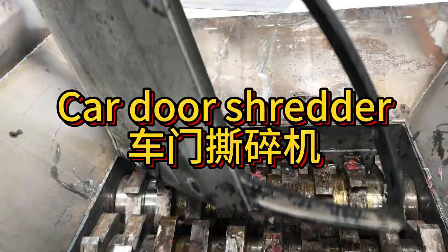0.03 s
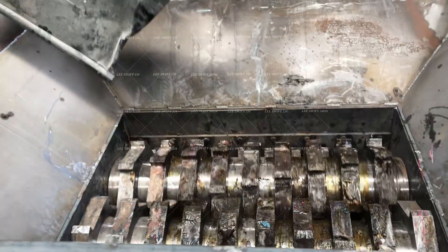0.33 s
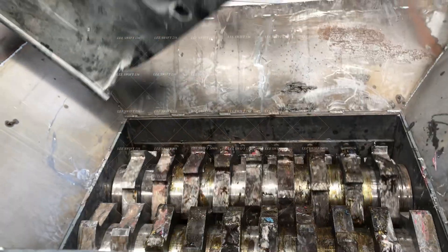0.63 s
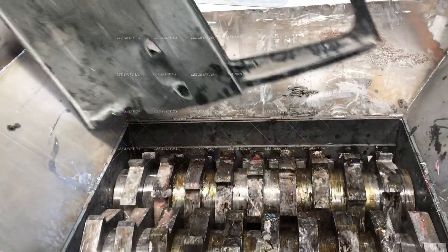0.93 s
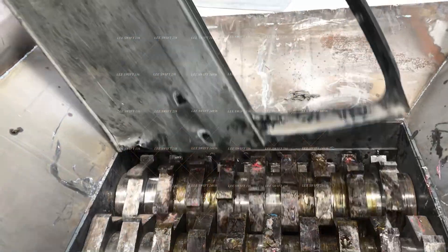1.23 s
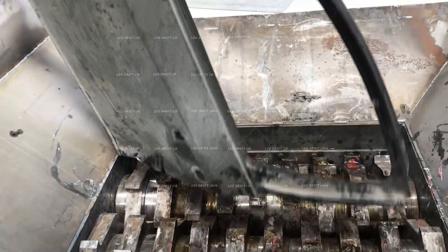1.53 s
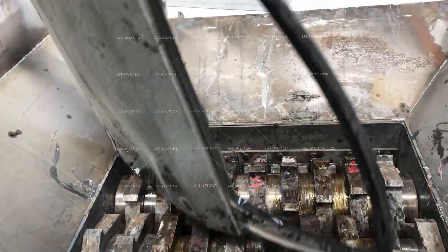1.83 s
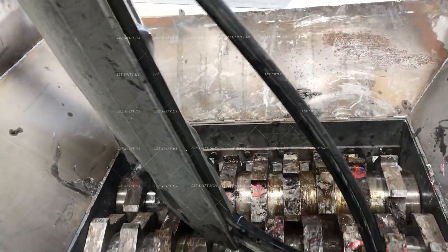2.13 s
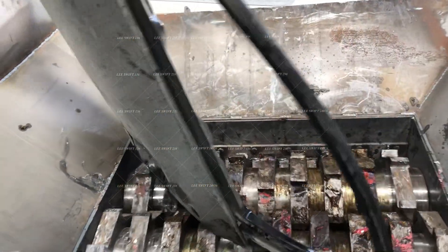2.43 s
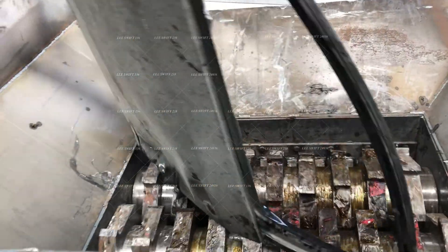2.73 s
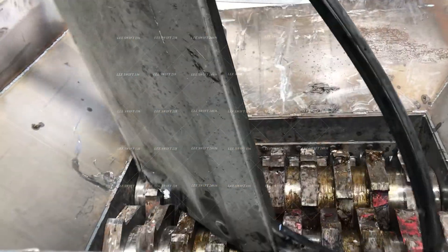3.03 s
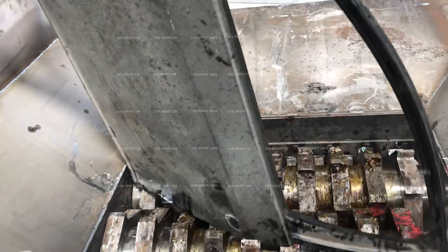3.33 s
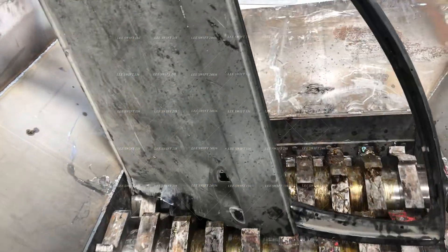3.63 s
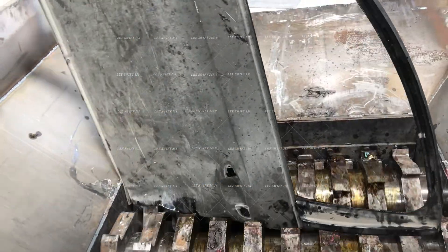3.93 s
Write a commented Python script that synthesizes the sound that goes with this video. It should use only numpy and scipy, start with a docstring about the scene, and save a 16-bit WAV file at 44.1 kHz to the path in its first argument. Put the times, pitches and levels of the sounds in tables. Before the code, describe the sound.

An industrial shredder rumbles while a metal car door scrapes and crunches in its teeth.

```python
"""A car door in a shredder

A twin-shaft shredder runs close by: its meshing gears hum and knock inside a rumbling steel hopper.
A sheet-metal car door slides onto the teeth and scrapes by stick-slip friction, then cracks, booms,
groans and tears as they bite. The sound is nearly mono, and a limiter holds down its peaks."""
import sys
import numpy as np
from scipy import signal
from scipy.fft import rfft, irfft, next_fast_len
from scipy.io import wavfile
from scipy.ndimage import uniform_filter1d, minimum_filter1d, map_coordinates

SR = 44100
rng = np.random.default_rng(int(sys.argv[2]) if len(sys.argv) > 2 else 0)


def generate_wav(sig):
    """Save sig (samples, or channels by samples) to the path in sys.argv[1] as 16-bit PCM at SR."""
    pcm = np.round(np.clip(np.atleast_2d(sig).T, -1, 1) * 32767).astype(np.int16)
    wavfile.write(sys.argv[1], SR, pcm)


N = 176400
START_S, TEAR_S = 0.1517, 3.05  # the sound cuts in; the sheet starts to tear


def amp(db):
    """Decibels to amplitude ratio."""
    return 10 ** (np.asarray(db) / 20)


def unit(x):
    """Normalisation to rms 1."""
    return x / np.sqrt(np.mean(x ** 2) + 1e-20)


def along(points, hz):
    """Interpolation of (frequency_hz, value) points on a logarithmic frequency axis."""
    frequencies, values = np.transpose(points)
    return np.interp(np.log(hz + 1), np.log(frequencies + 1), values)


def clock():
    """Time of every sample in seconds."""
    return np.arange(N) / SR


def curve(rows):
    """Linear interpolation of (time_s, value) points."""
    return np.interp(clock(), *np.transpose(rows))


def wobble(rate):
    """Smooth random modulation: a spline through `rate` Gaussian knots a second."""
    grid = np.arange(0, N / SR * rate + 1, 1 / 8)
    spline = map_coordinates(rng.standard_normal(8192), [grid + 2], mode="wrap")
    return np.interp(clock() * rate, grid, spline)


def envelope(start, length, attack, t60):
    """Linear attack, hold until `length`, then exponential decay; all in seconds."""
    t = clock() - start
    return np.clip(t / attack, 0, 1) * amp(-60 * np.maximum(t - length, 0) / t60)


def filtered(x, response):
    """Linear filtering: the spectrum times a frequency response."""
    size = next_fast_len(N + 8192)
    return irfft(rfft(x, size) * response(np.fft.rfftfreq(size, 1 / SR)), size)[..., :N]


def coloured(x, colour):
    """Spectral shaping by (frequency_hz, gain_db) points, normalised to rms 1."""
    return unit(filtered(x, lambda hz: amp(along(colour, hz))))


def band(hz, octaves):
    """A noise-driven resonance of rms 1: a Gaussian band with a 1/e half-width in octaves."""
    noise = rng.standard_normal(N)
    return unit(filtered(noise, lambda f: np.exp(-(np.log2((f + 1) / hz) / octaves) ** 2)))


def grit(rate, depth_db):
    """Stick-slip grains: noise under random amplitude modulation."""
    return rng.standard_normal(N) * amp(depth_db * wobble(rate))


def patchy(x, depth_db):
    """Uneven excitation of resonances: random patches of gain in time and frequency, at rms 1."""
    spectra = signal.stft(x, nperseg=512)[2]
    field = rng.standard_normal(spectra.shape)
    for _ in range(2):
        field = uniform_filter1d(field, size=9, axis=0)
        field = uniform_filter1d(field, size=3, axis=1)
    return unit(signal.istft(spectra * amp(depth_db * unit(field)), nperseg=512)[1][:N])


def hopper(x):
    """Reverberation between steel walls: each frequency decays at its own rate."""
    decay = [(200, 0.52), (2000, 0.85), (6000, 0.2), (16000, 0.068)]  # frequency_hz, t60_s
    out, step = np.zeros(N + SR), SR // 5
    for i in range(0, N, step):  # a fresh random tail each step stays diffuse, with no steady ring
        hz, t, spectra = signal.stft(rng.standard_normal(SR // 3), SR, nperseg=256)
        damping = amp(-60 * t / along(decay, hz)[:, None])
        tail = signal.istft(spectra * damping, SR, nperseg=256)[1]
        echo = signal.fftconvolve(x[i:i + step], tail / np.linalg.norm(tail))
        out[i:i + len(echo)] += echo
    return out[:N]


def gear_hum(mesh_cycles, whine_hz=878, whine_db=-38):
    """Periodic tooth contact radiates harmonics of the mesh rate; the motor adds a thin whine."""
    harmonics = [(1, -38), (3, -28), (4, -31), (5, -30.5), (6, -38.5)]  # gear partials: harmonic_number, level_db
    drone = [(0.16, -21.5), (0.5, -21), (0.8, -27.5), (1.48, -20.5), (1.63, -13.5), (1.76, -18),
             (2.22, -26), (2.69, -20.5), (2.75, -13), (2.85, -17.5), (3.24, -24), (3.28, -14), (3.35, -45),
             (3.44, -16.5), (3.65, -36), (3.88, -15.5), (4.0, -23.5)]  # strong second harmonic: time_s, level_db
    swells = [(0.21, 0.24, -28.5), (2.74, 0.052, -26), (2.9, 0.033, -18), (3.689, 0.25, -16.5)]  # third harmonic under load: start_s, length_s, level_db
    levels = {round(k): amp(db + 3.05 * wobble(8)) for k, db in harmonics}
    levels[2] = amp(curve(drone))
    swell = sum(amp(db) * envelope(start, length, attack=0.045, t60=0.22) for start, length, db in swells)
    levels[3] += swell * amp(1.6 * wobble(25))
    hum = amp(whine_db + 4.4 * wobble(3.7)) * np.sin(2 * np.pi * whine_hz * clock())
    for k, level in levels.items():
        phase = 2 * np.pi * (k * mesh_cycles + rng.random()) + 0.34 * wobble(13)
        hum += level * np.sqrt(2) * np.sin(phase)
    return hum


def rumble(mesh_cycles, jitter_s=0.0006, scatter_db=3.5, knock_t60_s=0.054):
    """Impact excitation: gear teeth knock the hopper with uneven force, over the churn of the shafts."""
    colour = [(20, -49), (60, -46), (88, -9), (115, -1.5), (165, 2), (245, 0), (310, -3.5), (400, -2.5),
              (560, -7), (750, -7), (920, -12.5), (1350, -14), (1900, -21.5), (2500, -29.5), (4000, -38.5),
              (9000, -47), (16000, -49)]  # hopper response: frequency_hz, gain_db
    load = [(0.16, -19), (0.35, -17.5), (0.75, -21), (1.15, -16.5), (1.16, -19.5), (1.38, -16), (1.81, -19),
            (2.22, -18), (2.26, -19.5), (3.24, -16.5), (3.26, -20.5), (3.56, -18), (3.97, -18.5),
            (4.0, -20.5)]  # rumble contour: time_s, gain_db
    contacts = np.flatnonzero(np.diff(np.floor(mesh_cycles)))
    timing, force = rng.standard_normal((len(contacts), 2)).T
    onsets = np.clip(contacts + (timing * jitter_s * SR).astype(int), 0, N - 1)
    knocks, t = np.zeros(N + SR), np.arange(SR // 16) / SR
    for i, size in zip(onsets, amp(scatter_db * force)):
        knocks[i:i + len(t)] += size * rng.standard_normal(len(t)) * amp(-60 * t / knock_t60_s)
    churn = grit(rate=100, depth_db=0.7)
    return amp(curve(load)) * (amp(-6) * coloured(knocks[:N], colour) + amp(1) * coloured(churn, colour))


def grinding():
    """Resonance: the cutters grind in one narrow band."""
    level = [(.16, -29), (1.2, -36), (1.6, -32.5), (2.3, -30), (2.6, -25.5), (3.0, -23.5), (3.35, -34),
             (3.53, -21.5), (3.72, -33), (4, -45)]  # cutter resonance: time_s, level_db
    return amp(curve(level)) * band(hz=670, octaves=0.14)


def frame_shake():
    """Forced vibration: the frame shakes at random in the deep bass."""
    strength = [(.16, -33), (.3, -27), (.88, -37), (.98, -19), (1.4, -22), (1.75, -31), (2.3, -33),
                (2.8, -38), (3.5, -28), (4, -37)]  # shake contour: time_s, gain_db
    colour = [(20, -36), (36, -16), (52, 11.5), (70, 10.5), (95, 10), (140, -35)]  # frame response: frequency_hz, gain_db
    return amp(curve(strength) - 4) * coloured(rng.standard_normal(N), colour)


def scraping():
    """Stick-slip friction: steel rubs on the teeth throughout, with harsh scrapes where the panel slips."""
    rub_level = [(.16, -46), (.3, -38), (.45, -42), (.93, -43.5), (1.1, -31.5), (1.33, -33), (1.65, -37.5),
                 (1.88, -43), (2.05, -37.5), (2.35, -50), (2.48, -43), (2.56, -42), (2.75, -42.5),
                 (3.0, -38.5), (3.38, -46), (3.55, -41), (3.7, -38.5), (4, -41)]  # continuous rubbing: time_s, level_db
    slips = [(0.218, 0.018, -33, -42), (0.965, 0.051, -24.5, -36), (1.012, 0.027, -23.5, -24),
             (1.049, 0.032, -25, -45), (1.168, 0.056, -22.5, -36), (1.271, 0.034, -23.5, -38),
             (1.722, 0.076, -34, -45), (1.93, 0.079, -32, -41), (2.535, .03, -41, -38),
             (3.213, 0.022, -36, -36), (3.573, 0.049, -29, -24.5), (3.626, 0.039, -46, -30.5),
             (3.691, 0.089, -37, -31.5), (3.79, 0.046, -27.5, -25), (3.86, .025, -51, -34),
             (3.914, 0.0069, -22, -39), (3.935, 0.052, -37, -34), (3.988, 0.018, -22.5, -37)]  # scrapes of the panel: start_s, length_s, rasp_db, sizzle_db
    # Friction spectra: frequency_hz, gain_db
    rub_colour = [(500, -11), (1500, 6.5), (3000, 6), (5000, 2), (8000, -1), (11000, -3.5), (15500, -1)]
    rasp_colour = [(400, -2), (1200, 12.5), (2300, -0.5), (3200, 1), (5500, 0.5), (8000, -3), (11000, -10),
                   (16000, 2.5)]
    sizzle_colour = [(3000, -33), (7500, -9.5), (10500, -4), (12500, -0.5), (14000, -2), (15500, 4)]
    gripped = [(3400, 0), (5000, -2.5), (8000, -1)]  # held by the teeth, the sheet rasps less shrilly
    rub = amp(curve(rub_level)) * patchy(coloured(grit(rate=42, depth_db=1.7), rub_colour), depth_db=3)
    rasp = patchy(coloured(grit(rate=150, depth_db=1.5), rasp_colour), depth_db=1)
    gripped_rasp = filtered(rasp, lambda hz: amp(along(gripped, hz)))
    rasp = np.where(clock() < TEAR_S, rasp, gripped_rasp)
    sizzle = patchy(coloured(grit(rate=110, depth_db=3), sizzle_colour), depth_db=1)
    scrapes = np.zeros(N)
    for start, length, rasp_db, sizzle_db in slips:
        friction = amp(rasp_db) * rasp + amp(sizzle_db) * sizzle
        scrapes += envelope(start, length, attack=0.0015, t60=0.083) * friction
    return rub + scrapes


def bending():
    """Tension raises pitch: a short rough groan climbs as the sheet is pulled tight."""
    groan = [(2.02, 150, -50), (2.051, 163.4, -19), (2.081, 182.2, -10.5), (2.109, 226.7, -32),
             (2.136, 244.4, -17), (2.172, 279, -24), (2.24, 290.6, -29), (2.3, 288, -55)]  # tone of the bending sheet: time_s, pitch_hz, level_db
    times, hz, db = np.transpose(groan)
    phase = 2 * np.pi * np.cumsum(np.interp(clock(), times, hz)) / SR + 0.5 * wobble(70)
    level = np.interp(clock(), times, amp(db), left=0, right=0)
    return level * np.sqrt(2) * np.sin(phase)


def booms():
    """Damped free vibration: clusters of panel modes ring and die after the big bites."""
    clusters = [(1.03, 1210, -23, 0.7), (1.0, 90, -21, 0.6), (2.025, 740, -19.5, 0.34),
                (2.07, 70, -28, 0.38), (3.175, 855, -16, 0.072), (3.195, 190, -12.5, 0.32)]  # panel modes: start_s, centre_hz, level_db, t60_s
    return sum(amp(db) * envelope(start, length=0.018, attack=0.0026, t60=t60) * band(hz, octaves=0.83)
               for start, hz, db, t60 in clusters)


def cracks():
    """Fracture releases energy in bursts: each a broad crunch or narrow clank, with a bright snap."""
    # The sheet gives way: start_s, length_s, centre_hz, half_width_octaves, crunch_db, snap_db
    fractures = [(0.221, 0.0042, 2600, 0.35, -31, -36), (0.275, 0.0065, 3000, 0.47, -34, -29.5),
                 (1.034, 0.037, 2700, 1.1, -29, -44), (2.026, 0.0088, 1900, 1.1, -17.5, -30),
                 (2.117, 0.0072, 1900, 1.2, -33, -35), (2.197, 0.0059, 2100, 0.85, -29.5, -31),
                 (2.9435, 0.0085, 1200, 1.1, -25, -34), (2.981, .005, 1600, .9, -27, -43),
                 (3.0844, 0.0047, 2200, 0.73, -23, -28.5), (3.136, 0.011, 1800, 0.45, -25, -45),
                 (3.171, 0.009, 1350, 1.25, -18.5, -24), (3.61, .005, 2800, 0.44, -29, -36),
                 (3.648, 0.0041, 1650, 0.5, -15.5, -15), (3.663, 0.0079, 1650, 0.87, -25, -33),
                 (3.781, 0.0043, 2800, .9, -28.5, -29), (3.81, .011, 3200, 0.93, -29, -40),
                 (3.907, 0.0072, 3280, 0.37, -29, -24), (3.962, 0.0032, 3000, 1.3, -29, -25.5),
                 (3.992, 0.007, 1830, 0.52, -21.5, -36)]
    snap_colour = [(1500, -35), (4000, -2), (8000, 3), (11000, -3), (15000, 5)]  # snap spectrum: frequency_hz, gain_db
    snap = coloured(grit(rate=900, depth_db=2.5), snap_colour)
    out = np.zeros(N)
    for start, length, hz, octaves, crunch_db, snap_db in fractures:
        burst = amp(crunch_db) * band(hz, octaves) + amp(snap_db) * snap
        out += envelope(start, length, attack=0.0012, t60=0.028) * burst
    return out


def scene(mesh_hz=67.28, mesh_drift=0.004, spread_delay_s=0.0019):
    """Mid-side stereo: all is centred; from TEAR_S on, a delayed copy of the steel's treble is added as a faint
    side signal."""
    spread = [(3000, -72), (4500, -30), (8000, -11.5), (11000, -11), (15000, -24)]  # stereo spread: frequency_hz, side_gain_db
    mesh_cycles = np.cumsum(mesh_hz * (1 + mesh_drift * wobble(4))) / SR
    scrape, crack = scraping(), cracks()
    steel = scrape + crack + hopper(amp(-4.5) * scrape + amp(-15) * crack)
    machine = gear_hum(mesh_cycles) + rumble(mesh_cycles) + grinding() + frame_shake()
    mid = machine + bending() + booms() + steel
    late_steel = steel * (clock() > TEAR_S)
    side = filtered(late_steel, lambda hz: amp(along(spread, hz)) * np.exp(-2j * np.pi * hz * spread_delay_s))
    fade_in = np.clip((clock() - START_S) / 0.011, 0, 1)
    return np.array([mid + side, mid - side]) * fade_in


def record(dry):
    """Fast peak limiting, then a steep low-pass filter."""
    ceiling, hold_s, cutoff_hz = 0.59, 0.0033, 16000
    window = int(hold_s * SR)
    needed = np.minimum(1, ceiling / (np.abs(dry).max(0) + 1e-9))
    gain = uniform_filter1d(minimum_filter1d(needed, window), window)
    return filtered(dry * gain, lambda hz: np.exp(-(hz / cutoff_hz) ** 150))


dry = scene()
out = record(dry)
generate_wav(out)
```